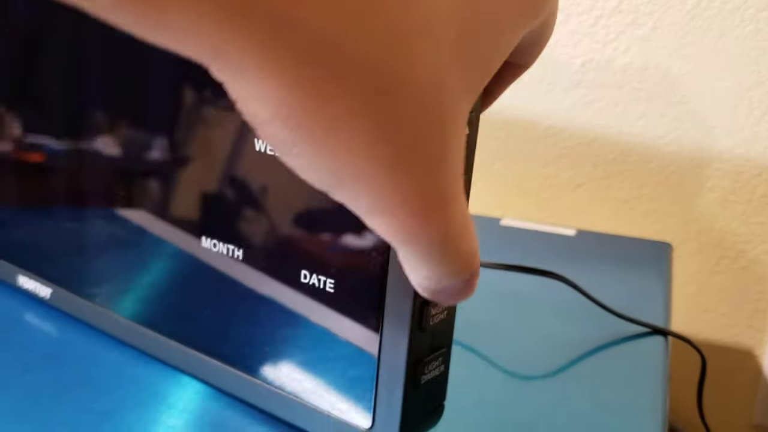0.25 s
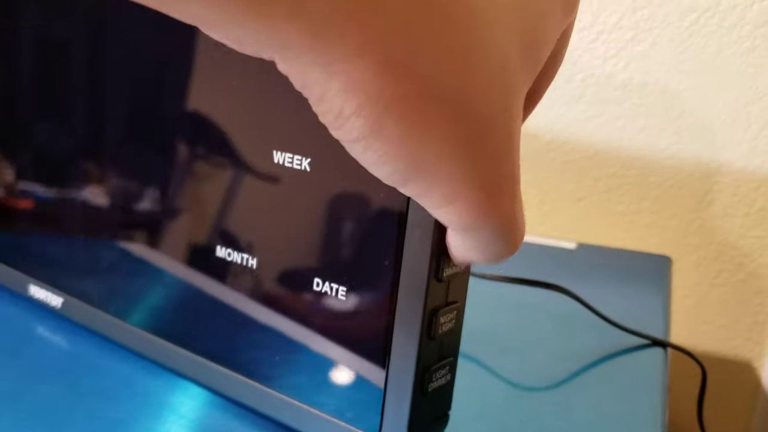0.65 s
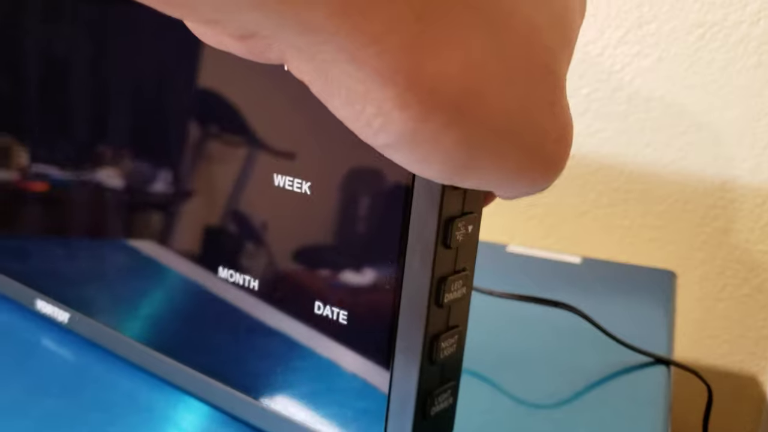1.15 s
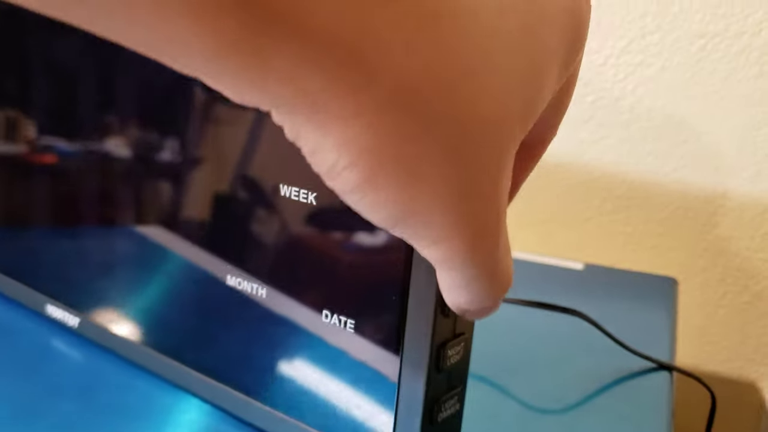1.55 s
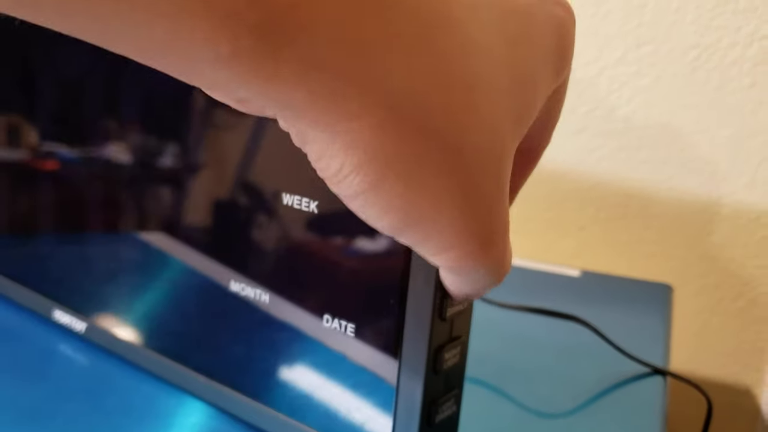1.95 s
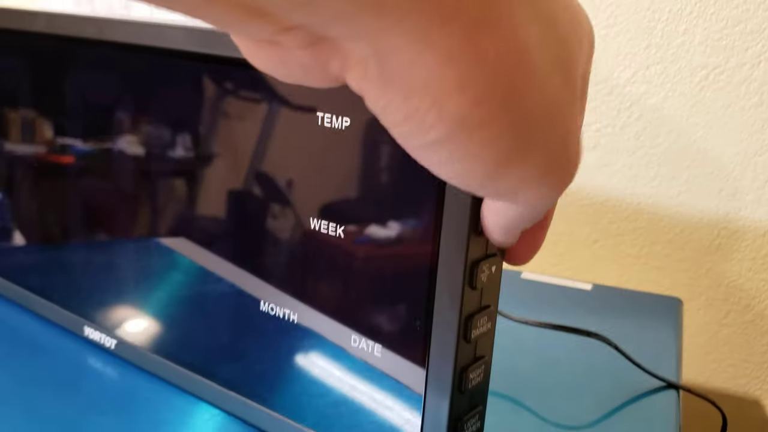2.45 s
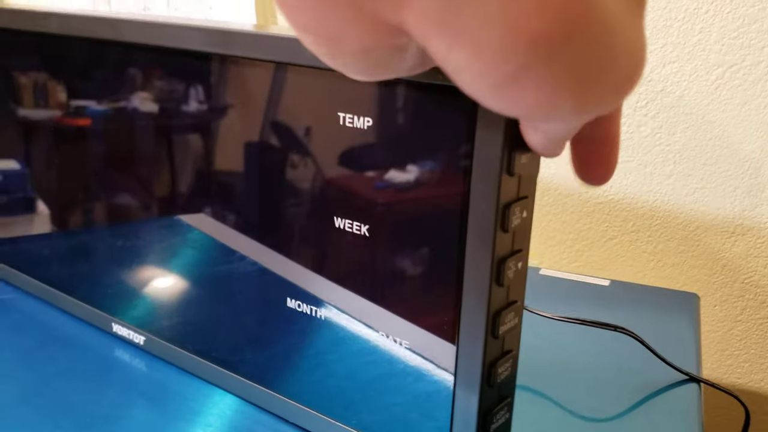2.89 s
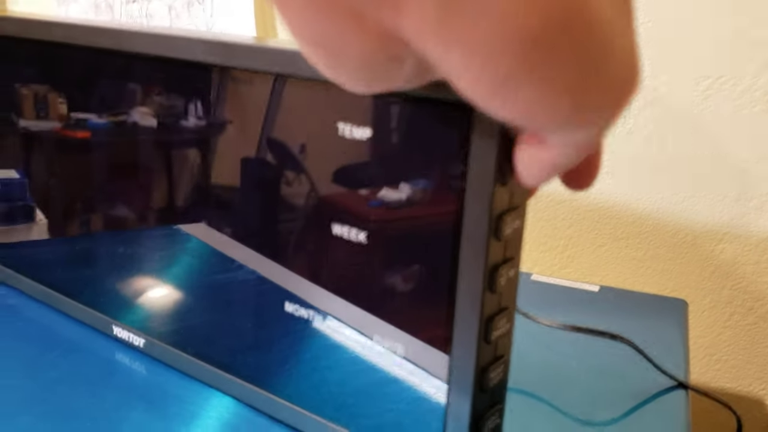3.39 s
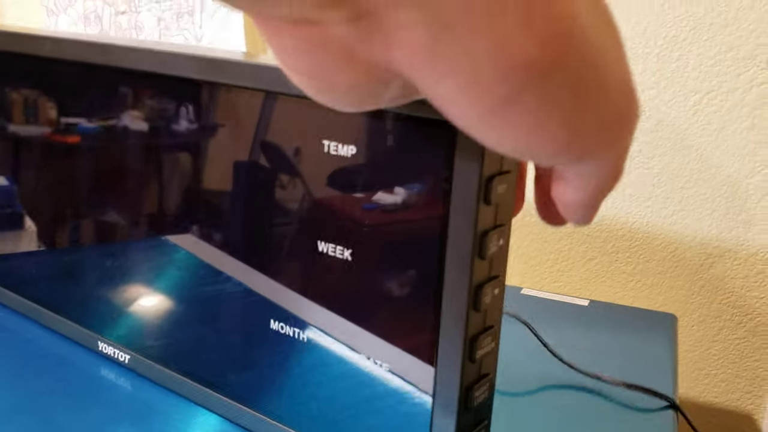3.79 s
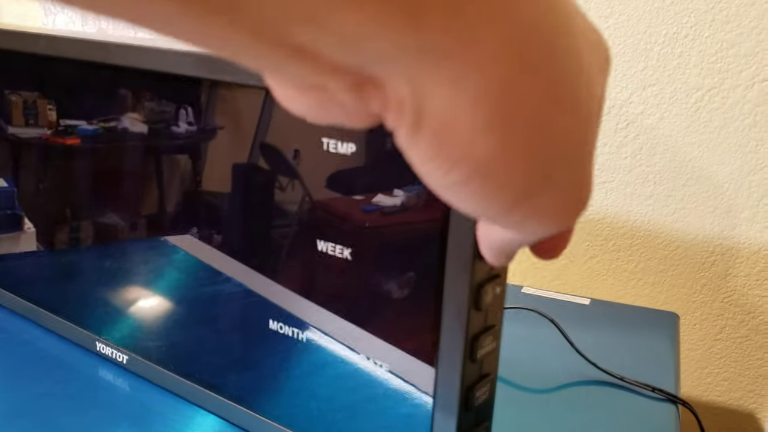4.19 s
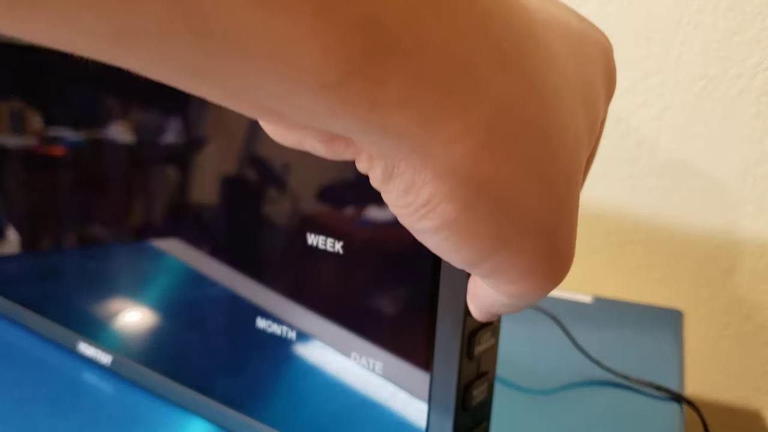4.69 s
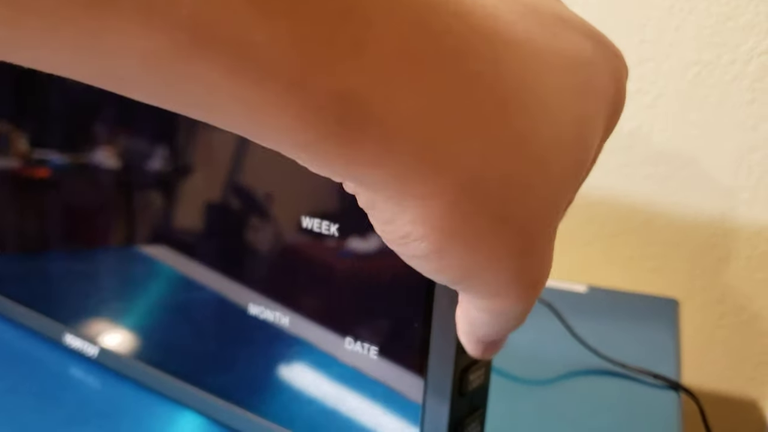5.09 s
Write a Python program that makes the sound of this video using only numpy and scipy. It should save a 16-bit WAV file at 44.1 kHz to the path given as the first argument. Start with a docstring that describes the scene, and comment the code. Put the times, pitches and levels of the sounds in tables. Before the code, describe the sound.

A hand softly brushes and bumps the plastic case of a digital desk clock. A sharp tick leads into one crisp button press and a hollower release. After a pause, four more pairs of clicks follow, with a brief, dull creak and scrape of the case among them. The microphones are close, in a small, quiet room with a faint low hum and hiss.

```python
"""The plastic buttons of a digital desk clock, pressed and released five times by a thumb, close to a
stereo pair of microphones. Each snap rattles the hollow case, rings the switch and thuds into the desk.
Between presses loose caps tick, the hand bumps and brushes the plastic, and once the case creaks and
scrapes under the grip. The place is a small, quiet room that answers every click; behind the clock lie
a wavering low hum, soft rumble, a faint whine and microphone hiss."""
import sys
import numpy as np
from scipy import signal
from scipy.fft import rfft, irfft, next_fast_len
from scipy.io import wavfile
from scipy.ndimage import uniform_filter1d

SR = 44100
rng = np.random.default_rng(int(sys.argv[2]) if len(sys.argv) > 2 else 0)


def file_out(sig):
    """Save sig as 16-bit WAV at sys.argv[1]."""
    # one column per channel
    cols = np.atleast_2d(sig).T
    # limit, then scale
    lim = np.clip(cols, -1, 1)
    pcm = np.round(lim * 32767).astype(np.int16)
    wavfile.write(sys.argv[1], SR, pcm)


N = 235449
TIME = np.arange(N) / SR
AGE = np.arange(SR // 3) / SR  # time since a blow, in s


def click(level_db, bright_db, t60, tune, switch_hz, switch_db, top_db, thud_db, case_db, switch_width):
    """A switch snaps over, close up: the plastic rattles, case and switch ring, the desk thuds."""
    # spectra of the plastic's dense rattle and of the thud: f/Hz, relative level/dB
    rattle_spectrum = [(150, -13), (620, -11.5), (850, -1.5), (1800, -1), (2400, -1), (3300, 1.5),
                       (4600, 0), (5600, -5.5), (7000, -6.5), (8800, -18), (11000, -9.5), (15000, -6.5),
                       (17000, -17)]
    thud_spectrum = [(60, -16.5), (130, -14.5), (210, -1), (360, -1.5), (480, -6.5), (650, -14),
                     (900, -23.5), (2500, -59.5)]
    # modes of the hollow case (before tuning) and of the desk: f/Hz, relative level/dB, t60/s
    case_modes = [(771, -7.5, 0.075), (839.5, -3, .065), (942.6, -7.5, 0.046), (1061.5, -6.5, 0.055),
                  (1159.7, -10, .05), (1368.8, -12.5, 0.049), (1611.3, -11.5, .045), (1898.2, -18, 0.026),
                  (3153.2, -14, 0.036), (3642, -17, 0.0223), (3937, -10.5, 0.023), (4240, -22, 0.02),
                  (4890, -21, 0.039)]
    desk_modes = [(120.1, -8.5, .4), (175.3, -1, .45), (218.36, 0, 0.4), (292.3, -2.5, .35), (362.6, 1, .3),
                  (560, -3.5, 0.33), (611, -12, .22)]
    fizz_db = top_db - .6 * min(bright_db, 0)  # the top fizz escapes 60 % of the thumb's muffling
    rattle = noise(lambda f: read(rattle_spectrum, f), len(AGE))
    rattle = colour(rattle, lambda f: bright_db / (1 + (1900 / (f + 1)) ** 4)
                    + fizz_db / (1 + (9000 / (f + 1)) ** 6))
    rattle *= fade(AGE, t60) + .5 * fade(AGE, .0061)  # the short term is the opening crack
    case = amp(case_db) * ring(case_modes, tune) * amp([[1.5], [-1.5]])
    switch = noise(lambda f: 2 * hump(switch_hz, switch_hz / switch_width)(f), len(AGE))
    switch *= amp(switch_db) * fade(AGE, .0416)
    # the small case radiates little below its first mode
    snap = signal.sosfilt(signal.butter(3, 560, "high", fs=SR, output="sos"), rattle + case + switch)
    thud = noise(lambda f: read(thud_spectrum, f), len(AGE)) * fade(AGE, .0805)
    desk = amp(-11.5) * ring(desk_modes, spread=.15) * (1 - fade(AGE, .075))  # heavy, slow to move
    attack = 1 - fade(AGE, .00373)
    return amp(level_db) * attack * (snap + amp(thud_db) * (thud + desk))


def tick(level_db, hz, t60, grit_db):
    """A loose cap touches its guide: two short modes and grit, too small a part to radiate bass."""
    grit = amp(grit_db) * noise(hump(hz, q=1.54), len(AGE)) * fade(AGE, t60)
    pair = ring([(hz, -1, t60), (hz * 1.08, -5, t60 * .64)], spread=.5306)
    low_cut = signal.butter(2, min(.663 * hz, SR / 3), "high", fs=SR)
    return amp(level_db) * signal.lfilter(*low_cut, pair + grit)


def creak_and_scrape(slips_per_s=125, jitter=.5, rub=.086, dull_hz=2000, grit_db=-19):
    """Uneven slips under the grip ring the case as a dull creak, then break into a gritty scrape."""
    # modes of the gripped case: f/Hz, relative level/dB, t60/s
    grip_modes = [(249, -20, 0.034), (447, -10, 0.019), (609, -9.5, 0.025), (796, -3.5, .03),
                  (942.7, 0, 0.023), (1085, -2.5, 0.0187), (1567, -9, 0.014), (2590, -4, .012)]
    # scraping plastic: f/Hz, relative level/dB
    scrape_spectrum = [(71, -45), (120, -29), (256, -5.5), (454, -5.5), (949, -3.5), (1340, -5.5),
                       (3310, -6.5), (3590, -10.5), (5750, -18), (8480, -30), (16000, -40)]
    # the two pushes: t/s, attack/s, hold/s, t60/s, level/dB
    creak_push = (3.803, .026, .04, .16, -44.5)
    scrape_push = (3.861, .022, .02, .1, -43)
    wander = unit(uniform_filter1d(rng.standard_normal(N), 300))
    cycles = np.cumsum(slips_per_s * (1 + jitter * wander)) / SR
    slips = np.diff(np.floor(cycles), prepend=0) + rub * rng.standard_normal(N)
    creak = signal.oaconvolve(slips[None], ring(grip_modes, spread=.427), axes=1)[:, :N]
    creak = unit(signal.lfilter(*signal.butter(3, dull_hz, fs=SR), creak))
    grains = np.exp(-(cycles % 1) / .9)  # one burst a slip
    scrape = unit(noise(lambda f: read(scrape_spectrum, f), N) * grains)
    return push(*creak_push) * (creak + amp(grit_db) * scrape) + push(*scrape_push) * scrape


def push(start, attack, hold, t60, level_db):
    """Gain of one push on the case: it builds up, holds and dies away."""
    t = TIME - start
    return amp(level_db) * np.clip(t / attack, 0, 1) * fade(np.maximum(t - attack - hold, 0), t60)


def bump(level_db, hz, t60):
    """The hand bumps the case: soft flesh gives a slow attack and no treble."""
    thump = noise(lambda f: 3 * hump(hz, q=.9)(f), len(AGE))
    return amp(level_db) * thump * fade(AGE, t60) * (1 - fade(AGE, .02))


def brush(length, level_db, hz):
    """Skin brushes the plastic in a swell of fine friction."""
    # colour of the rubbed plastic: f/Hz, gain/dB
    skin_colour = [(1000, 8), (1800, -2), (2250, 0.5), (2600, -2), (2900, 2.5), (3600, -3), (4400, 0.5),
                   (5200, -10), (6800, 3), (8500, -8.5), (12000, 5)]
    size = int(length * SR)
    friction = noise(lambda f: hump(hz, q=1.2)(f) + read(skin_colour, f), size)
    return amp(level_db) * friction * np.hanning(size)


def room(x, sets=3, turns_per_s=6):
    """The small room's reverberation; reflection sets alternate so no pitch rings on every click."""
    turn = TIME * turns_per_s
    wet = np.zeros((2, N))
    for k in range(sets):
        share = np.sin(np.pi / 2 * np.minimum((turn - k) % sets, 2))
        wet += signal.oaconvolve(x * share, reflections(), axes=1)[:, :N]
    return wet


def reflections(build_s=.01768):
    """The nearby desk and wall reflect first; a diffuse tail builds up and dies band by band."""
    # reverberation of the small room: f/Hz, t60/s, level/dB
    room_bands = [(100, .6, 5.5), (350, 0.3974, 7.5), (800, 0.3235, -2.5), (1910, 0.2875, -0.5),
                  (4300, 0.312, -5.5), (7960, 0.264, -2.5), (15000, 0.29, -8.5)]
    bands = np.array(room_bands)
    hz, t, spectra = signal.stft(noise(lambda f: 0 * f, SR * 3 // 4), SR, nperseg=256)
    t60, wet_db = read(bands[:, :2], hz)[:, None], read(bands[:, ::2], hz)[:, None]
    tail = signal.istft(spectra * amp(wet_db) * fade(t, t60) / np.sqrt(t60), SR, nperseg=256)[1]
    t = np.arange(tail.shape[1]) / SR
    tail *= np.sqrt(np.log(1e6) / SR) * (1 - np.exp(-(t / build_s) ** 2))
    for delay_s, db in [(.0049, -16.5), (.0118, -16), (.041, -20.5)]:
        for side in tail:
            side[int(delay_s * SR * rng.uniform(.9, 1.1))] += amp(db)
    return tail


def hum(hz=59.01, octave_db=-18, trim_db=.6, waver=.42):
    """The room's low hum: a tone and its octave, wavering with a narrow band of noise."""
    # rise and fall of the hum: t/s, level before trim/dB
    hum_levels = [(0.0, -65), (0.31, -57), (1.41, -83), (1.59, -66), (2.15, -51), (2.38, -62), (2.47, -55),
                  (2.72, -63), (2.86, -56), (2.93, -72), (3.06, -56), (3.84, -70), (3.99, -63), (4.3, -69),
                  (4.82, -52), (5.19, -57), (5.26, -51), (5.34, -59)]
    level_db = np.interp(TIME, *np.transpose(hum_levels)) + trim_db
    phase = 2 * np.pi * hz * TIME
    tone = np.sqrt(2) * (np.sin(phase) + amp(octave_db) * np.sin(2 * phase))
    return amp(level_db) * unit(tone + waver * noise(lambda f: 2 * hump(hz, q=3)(f), N))


def rumble(floor_db=-69):
    """A soft rumble that swells as the hand shifts its hold."""
    # colour of the rumble: f/Hz, relative level/dB
    rumble_spectrum = [(20, -8), (40, -8), (80, 6.5), (125, 1), (165, -1.5), (290, -2.5), (420, 1),
                       (560, -16.5), (900, -23.5), (3000, -35.5)]
    # shifts of the hand: middle t/s, length/s, level/dB
    shifts = [(.02, .4, -62.5), (1.7, .4, -66), (2.3, .8, -65.5), (4.0, .4, -70), (4.92, .9, -60.5)]
    swells = sum(amp(db) * np.cos(np.pi * np.clip((TIME - s) / length, -.5, .5)) ** 2
                 for s, length, db in shifts)
    return (amp(floor_db) + swells) * noise(lambda f: read(rumble_spectrum, f), N)


def whine():
    """Faint steady tones of an appliance somewhere in the room."""
    # the appliance's tones: f/Hz, level/dB
    tones = [(635.2, -90.5), (1470, -93.5), (2078, -101), (2374, -100), (2907, -99)]
    return sum(amp(db) * np.sqrt(2) * np.sin(2 * np.pi * (hz * TIME + rng.random((2, 1))))
               for hz, db in tones)


def hiss(level_db=-74.5):
    """The microphones' own steady noise."""
    # noise floor: f/Hz, relative level/dB
    hiss_spectrum = [(100, 9), (700, 5.5), (1400, 0.5), (2400, -0.5), (4000, -4.5), (7000, -8.5),
                     (8800, -17), (12000, 0.5), (15500, 3), (17000, -14)]
    return amp(level_db) * noise(lambda f: read(hiss_spectrum, f), N)


def ring(modes, tune=1, spread=.389):
    """Dying modes; each reaches the two microphones at its own phase."""
    out = np.zeros((2, len(AGE)))
    for hz, db, t60 in modes:
        phase = rng.uniform(0, 2 * np.pi) + spread * rng.choice([-1, 1]) * np.array([[1], [-1]])
        out += amp(db) * fade(AGE, t60) * np.sin(2 * np.pi * hz * tune * AGE + phase)
    return out


def noise(db_at, size):
    """Coloured noise of rms 1 at the two microphones: alike in the bass, unrelated in the treble."""
    # likeness across the pair: f/Hz, left-right correlation
    likeness = [(50, 0.772), (300, 0.939), (600, 0.9), (1000, 0), (3000, 0.066), (15000, 0)]
    hz = np.fft.rfftfreq(2 * next_fast_len(size // 2 + 1), 1 / SR)
    mid, side = np.exp(2j * np.pi * rng.random((2, len(hz)))) * amp(db_at(hz))
    same = read(likeness, hz)
    mid, side = mid * np.sqrt(1 + same), side * np.sqrt(1 - same)
    return unit(irfft([mid + side, mid - side])[:, :size])


def colour(x, db_at):
    """Filters by a gain in dB given as a function of frequency."""
    size = next_fast_len(x.shape[-1])
    return irfft(rfft(x, size) * amp(db_at(np.fft.rfftfreq(size, 1 / SR))), size)[..., :x.shape[-1]]


def hump(hz, q):
    """The dB curve of one resonance."""
    return lambda f: -10 * np.log10(1 + (q * ((f + 1) / hz - hz / (f + 1))) ** 2)


def read(points, hz):
    """Reads a curve on a log-frequency axis."""
    f, value = np.transpose(points)
    return np.interp(np.log(hz + 1), np.log(f + 1), value)


def fade(t, t60):
    """Decay by 60 dB in t60 seconds."""
    return np.exp(-np.log(1000) * t / np.maximum(t60, 1e-3))


def amp(db):
    """Decibels to gain."""
    return 10 ** (np.asarray(db) / 20)


def unit(x):
    """Scales to rms 1."""
    return x / np.sqrt(np.mean(x ** 2) + 1e-20)


def add(mix, s, sound):
    """Mixes a stereo sound in at s seconds."""
    part = mix[:, max(round(s * SR), 0):]
    part[:, :sound.shape[1]] += sound[:, :part.shape[1]]


def scene(tick_room_db=-7):
    """The clock handled close to the microphones, with the quiet room behind it."""
    # buttons snap down and spring back:
    # t/s, level/dB, brightness/dB, rattle t60/s, case tuning factor, switch f/Hz, switch level/dB
    presses = [(1.6979, -28.4, 4, .03, 1.029, 4250, -.5), (3.2598, -30.5, 3.7, .066, .985, 4123, -5),
               (4.1100, -28.5, -1.7, .057, 1.0, 4150, 4.5), (4.6223, -39.7, 7, .053, .98, 2900, -3),
               (5.0800, -30.3, .3, .07, 1.0, 3500, -6)]
    releases = [(1.8513, -31.2, -17, .052, 1.0146, 3220, -30), (3.4130, -35, -12, .07, .98, 3250, -27),
                (4.3090, -30.5, 0, .068, 1.06, 4020, -1.5), (4.773, -37.7, -9.5, .135, .93, 3910, -18),
                (5.2399, -32.2, 4, .05, 1.089, 4004, -1)]
    # a press is crisp, a release more hollow: top fizz/dB, thud/dB, case ring/dB, switch width/Hz
    press_tone = (-3.8, -18.7, -4.7, 950)
    release_tone = (.5, -13.3, -2.2, 360)
    # the hand meets the case: t/s, level/dB, f/Hz, t60/s
    bumps = [(0.06, -63.5, 342, 0.31), (1.015, -58.5, 511.6, 0.067), (1.03, -61, 247, 0.19),
             (1.634, -54.5, 340, 0.147), (2.102, -54, 220, 0.173), (5.254, -45.5, 157.4, 0.306),
             (5.282, -47.5, 183, 0.207)]
    # skin on plastic: t/s, length/s, level/dB, centre f/Hz
    brushes = [(0.19, 0.135, -65.3, 5550), (0.355, 0.11, -71.8, 4550), (0.693, 0.0575, -70.5, 2050),
               (0.849, 0.071, -77.5, 4000), (1.992, .3, -77, 2000), (2.33, 0.33, -74, 2100),
               (4.799, 0.121, -63.5, 2050), (4.879, 0.1023, -70.5, 4500)]
    # the thumb finds the loose caps: t/s, level/dB, f/Hz, t60/s, grit/dB
    ticks = [(0.706, -64, 2400, 0.0266, 1.5), (1.5584, -25.7, 4550, 0.0095, -10),
             (1.5635, -43, 4380, .014, -5), (1.6473, -50.5, 3250, 0.018, -8), (1.6917, -43, 3000, 0.059, 0),
             (1.928, -58.5, 3340, 0.018, -7), (3.995, -62.5, 4057, 0.026, 0), (4.573, -62, 8550, 0.016, 3),
             (5.0774, -53, 3200, .02, -9)]
    handling, caps = np.zeros((2, 2, N))
    for s, *row in presses:
        add(handling, s, click(*row, *press_tone))
    for s, *row in releases:
        add(handling, s, click(*row, *release_tone))
    for s, *row in bumps:
        add(handling, s, bump(*row))
    for s, *row in brushes:
        add(handling, s, brush(*row))
    for s, *row in ticks:
        add(caps, s, tick(*row))
    handling += creak_and_scrape()
    reverb = room(handling + amp(tick_room_db) * caps)
    lows = (hum() + rumble()) * amp([[.7], [-.7]])  # a little to the left
    return handling + caps + reverb + lows + hiss() + whine()


def record(dry):
    """The two microphones differ a little in colour; the band ends at 16.3 kHz."""
    # f/Hz, left minus right/dB
    lean = [(60, 0), (160, 4), (500, -.5), (1100, 2.8), (2200, -1.8), (4500, -.8), (9000, 1),
            (14000, -3.7)]
    heard = colour(dry, lambda f: np.outer([.5, -.5], read(lean, f)))
    band_limit = signal.firwin(255, 16300, window=("kaiser", 8), fs=SR)
    return signal.oaconvolve(heard, band_limit[None], "same")


dry = scene()
out = record(dry)
file_out(out)
```